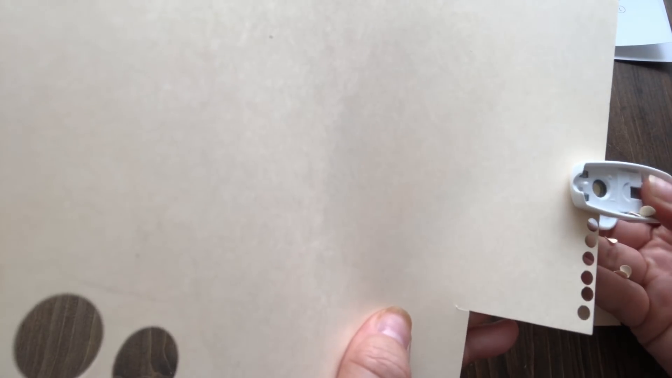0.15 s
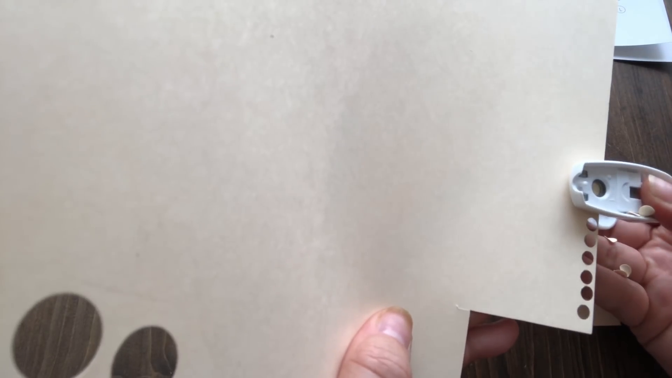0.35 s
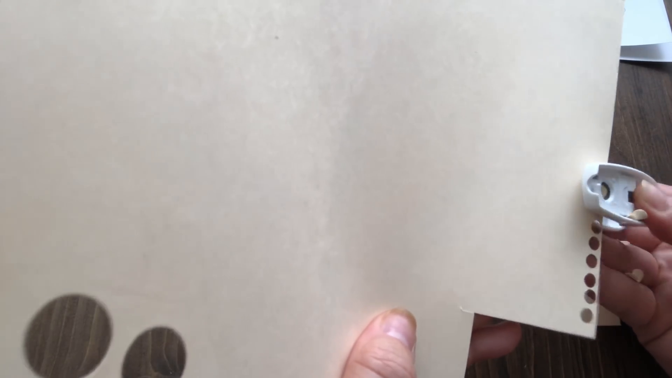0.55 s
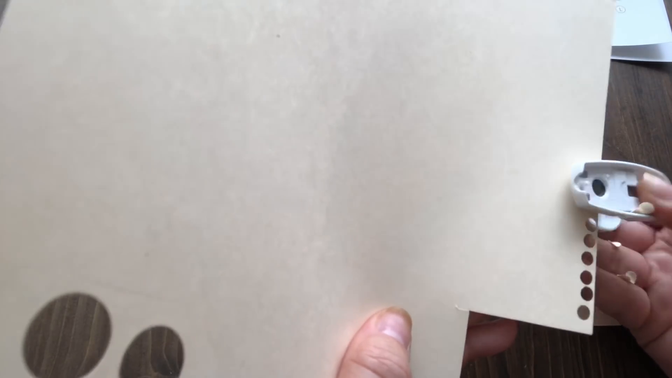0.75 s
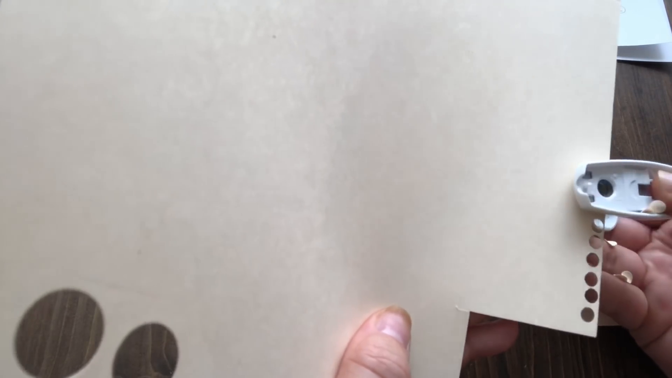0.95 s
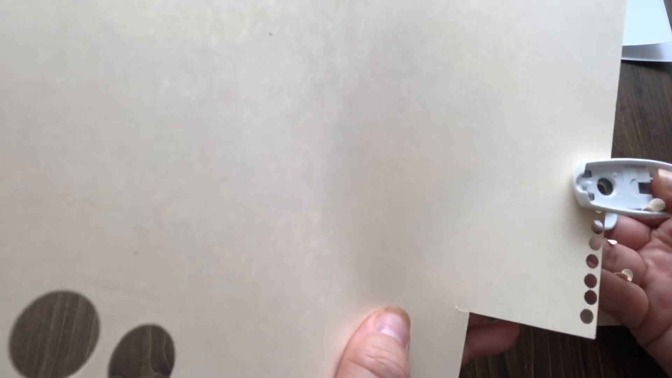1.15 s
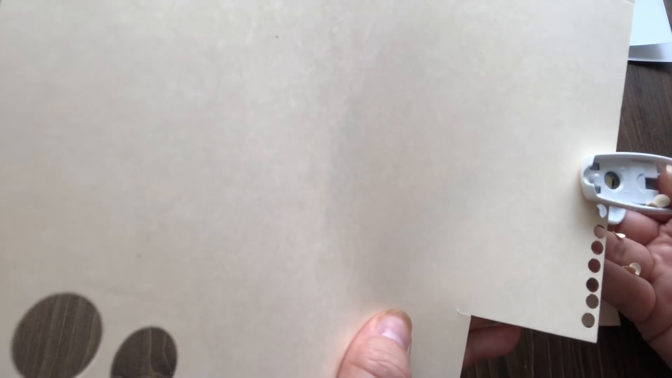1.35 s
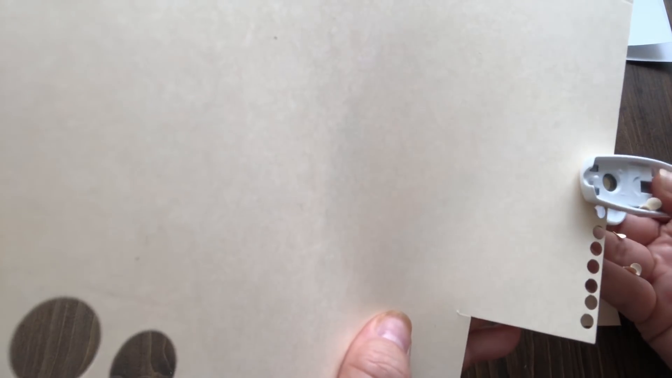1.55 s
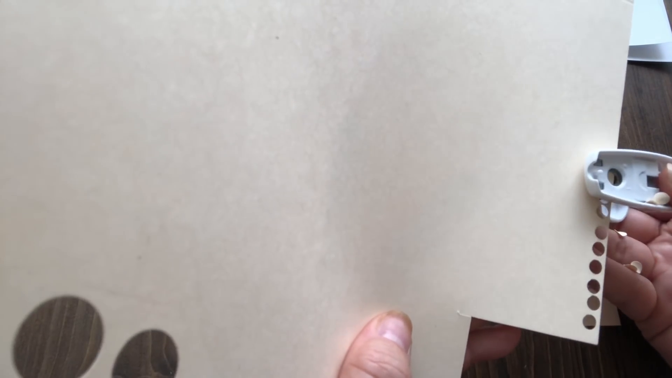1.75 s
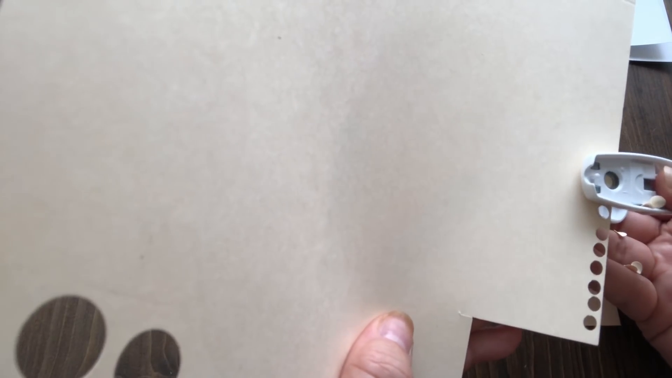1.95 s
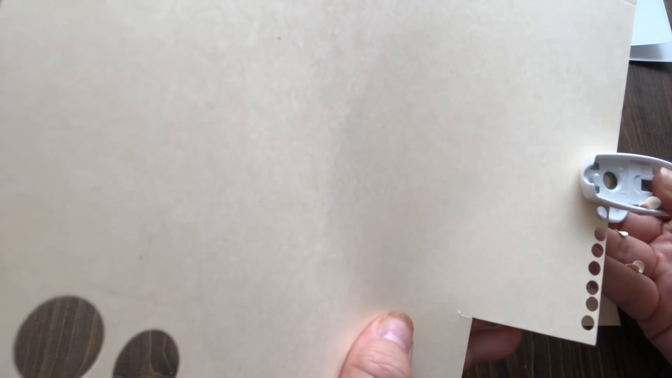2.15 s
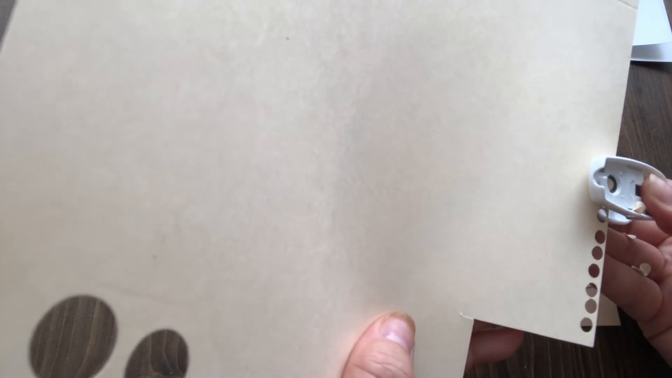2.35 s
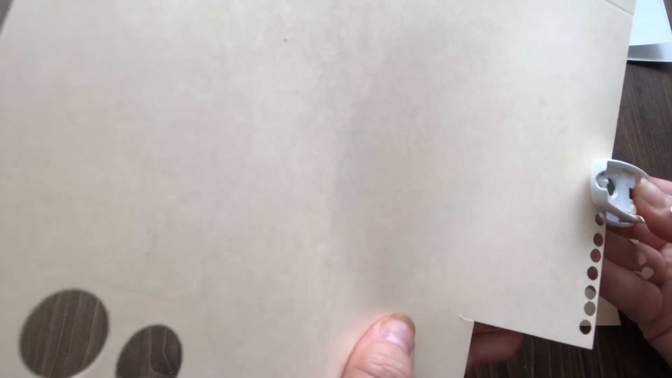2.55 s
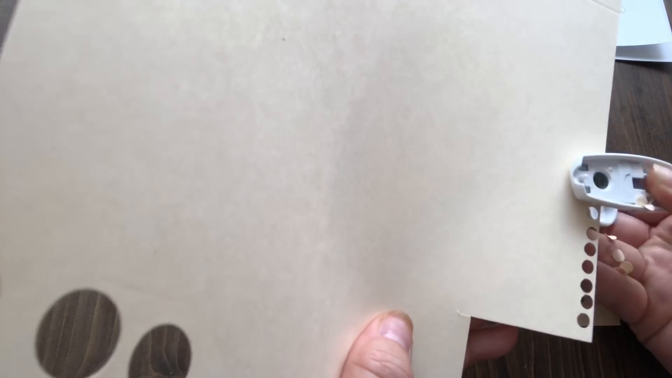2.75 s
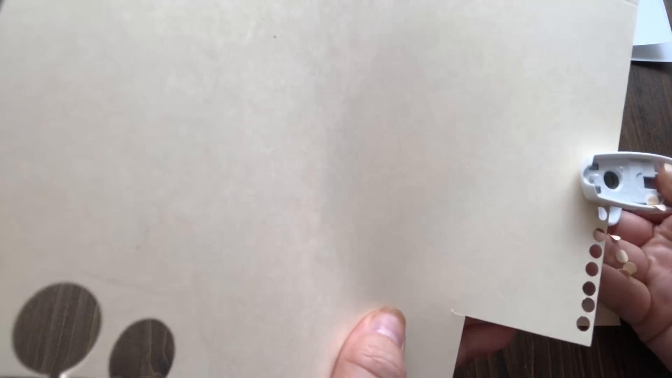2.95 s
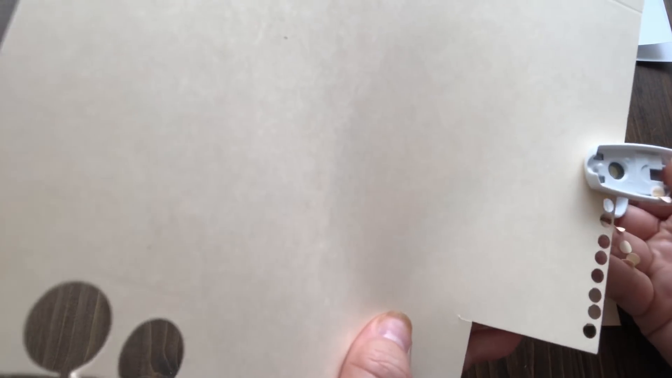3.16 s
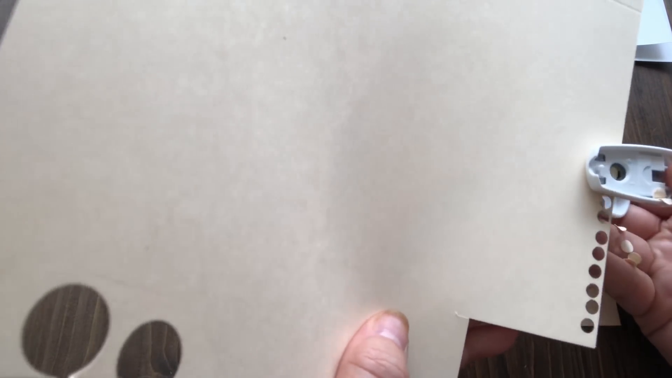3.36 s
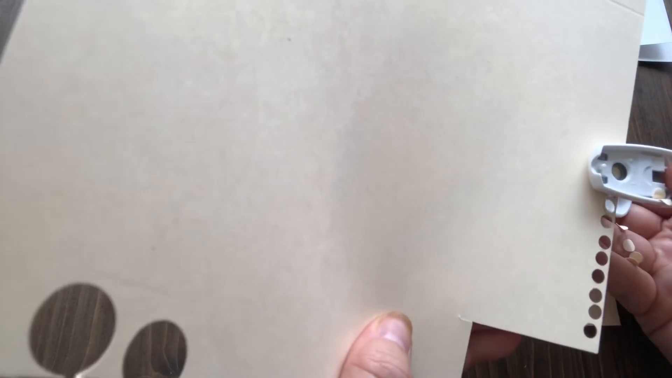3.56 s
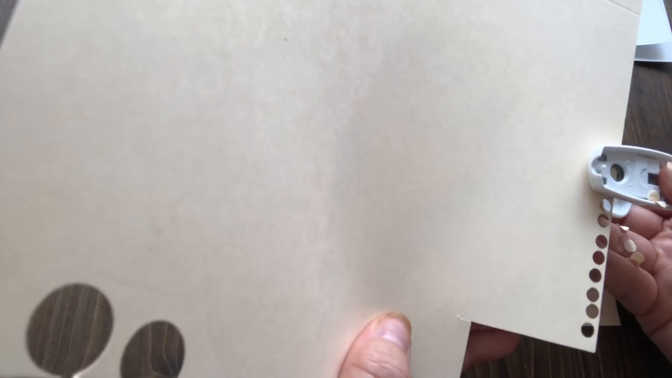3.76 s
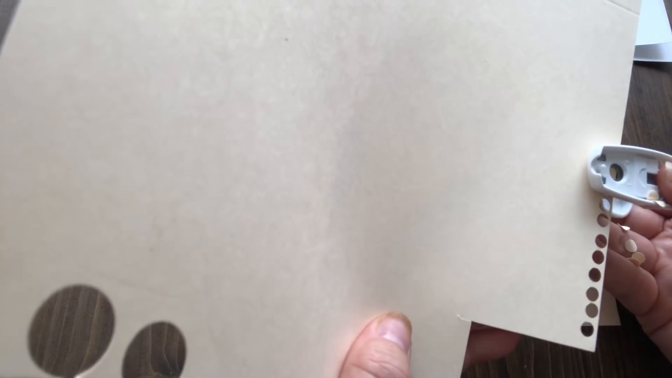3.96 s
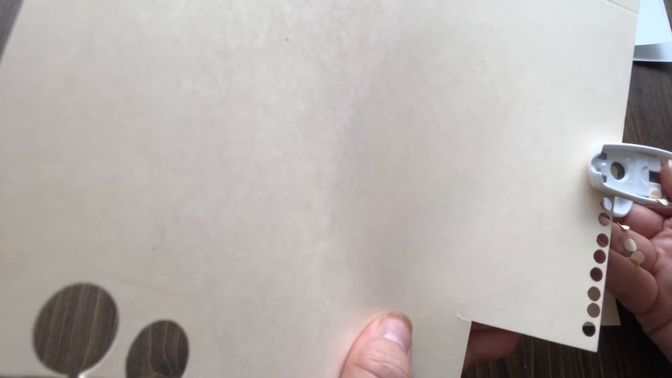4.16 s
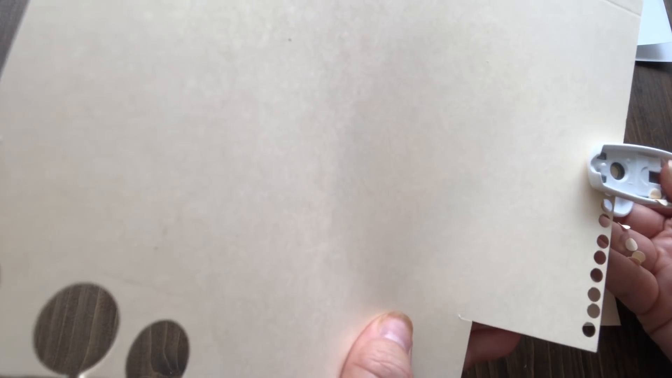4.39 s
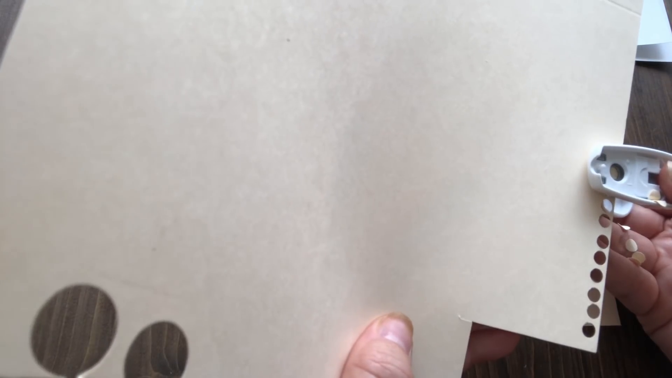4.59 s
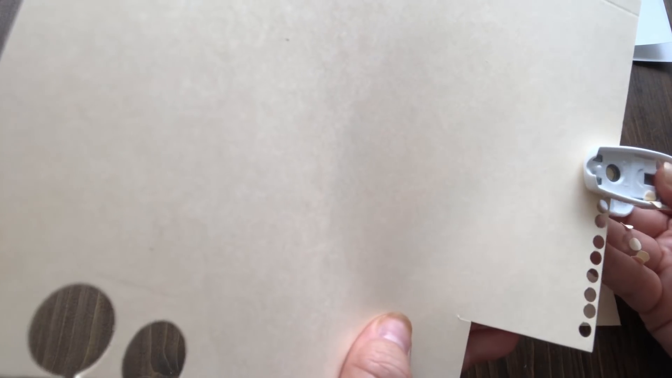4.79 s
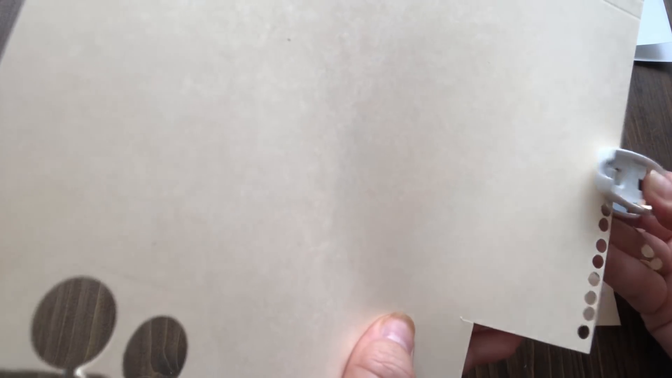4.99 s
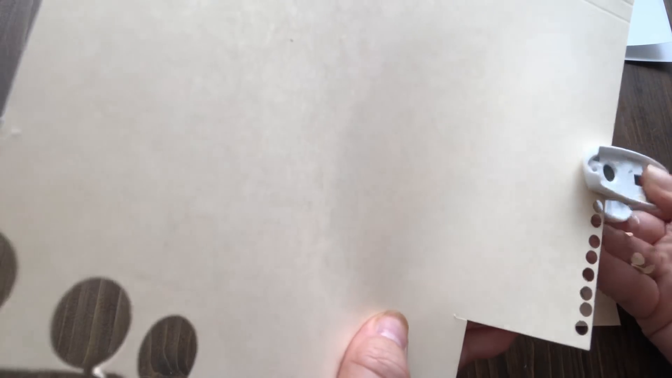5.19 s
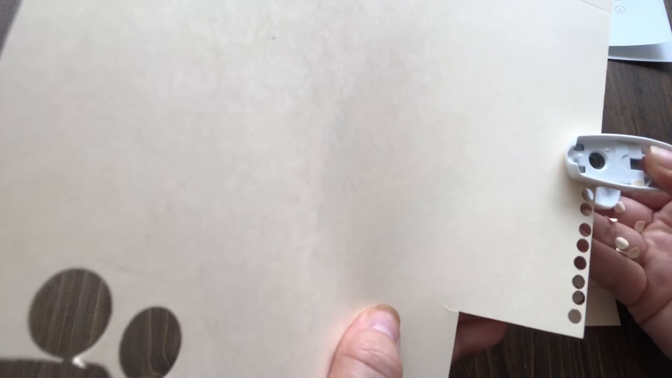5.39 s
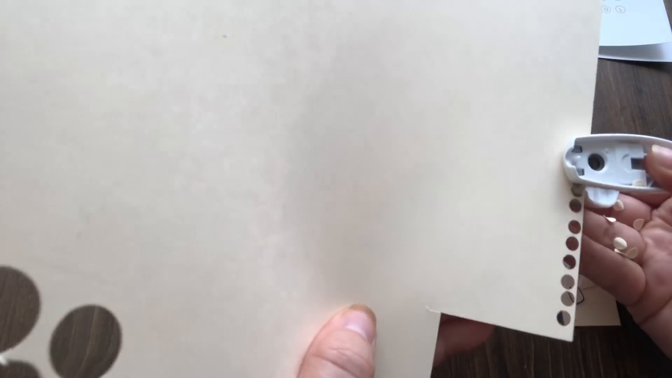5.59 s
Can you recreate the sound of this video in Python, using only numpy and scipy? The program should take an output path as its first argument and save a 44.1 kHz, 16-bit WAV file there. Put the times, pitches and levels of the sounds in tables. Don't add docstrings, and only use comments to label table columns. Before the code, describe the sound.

A small handheld punch crunches and snaps through a card folder three times, with light sliding and ticking between, over faint ventilation hum.

```python
import sys
import numpy as np
from scipy import signal
from scipy.fft import rfft, irfft
from scipy.io import wavfile
from scipy.ndimage import uniform_filter1d

SR = 44100
rng = np.random.default_rng(int(sys.argv[2]) if len(sys.argv) > 2 else 0)


def int16_out(signal):
    q = np.round(np.clip(np.atleast_2d(signal).T, -1, 1) * 32767)
    wavfile.write(sys.argv[1], SR, q.astype(np.int16))


def gain_from_db(level_db):
    decades = np.asarray(level_db, float) / 20
    return 10 ** decades


N = 248283


def unit(x):
    return x / np.sqrt(np.mean(x ** 2) + 1e-30)


def ring(x, hz, width):
    return signal.lfilter(*signal.iirpeak(hz, hz / width, fs=SR), x)


def body(x, modes):
    return sum((-1) ** k * gain_from_db(db) * ring(x, hz, width) for k, (hz, width, db) in enumerate(modes))


def add(out, s, x):
    i = int(s * SR)
    out[i:i + len(x)] += x[:N - i]


def grit(size, spread_db):
    return rng.standard_normal(size) * gain_from_db(spread_db * rng.exponential(size=size))


# frequency [Hz], level [dB per Hz].
HUM = [(20, -45), (31, -33), (50, -32.5), (62, -16), (99, -15.5), (130, 0.5), (220, -1), (310, -2.5),
       (400, -12), (1000, -17), (2000, -27.5), (4000, -30), (8000, -40), (15600, -49)]
# frequency [Hz], width [Hz], level [dB].
DUCT = [(80.4, 13, -65.5), (180, 4.6, -62.5), (253, 23, -56), (467, 28, -65.5), (7224, 60, -83.5),
        (9800, 30, -92.5)]


def hum():
    bin_hz = np.maximum(np.arange(N // 2 + 1) * SR / N, 1)
    hz, db = np.transpose(HUM)
    colour = gain_from_db(np.interp(np.log(bin_hz), np.log(hz), db))
    air = gain_from_db(-53.5) * unit(irfft(rfft(rng.standard_normal(N)) * colour, N))
    swell = unit(uniform_filter1d(rng.standard_normal(N), size=8000))
    ducts = sum(gain_from_db(db) * unit(ring(rng.standard_normal(N), f, width)) for f, width, db in DUCT)
    return (air + ducts) * gain_from_db(.7 * swell)


# centre [Hz], decay time t60 [s], level [dB].
ROOM = [(493, 0.21, -18.5), (789, 0.3, -21), (1290, 0.33, -20), (2093, 0.31, -21.5), (3170, 0.43, -20.5),
        (4780, .25, -20.5), (6300, 0.36, -18.5), (7850, 0.17, -19.5), (10500, 0.38, -20),
        (14000, 0.18, -18.5)]


def room(x):
    t, out = np.arange(SR // 2) / SR, 0
    start = np.clip((t - .002) / 0.0019, 0, 1)
    start = start * (1 + 6.4 * np.exp(-t / 0.0066))
    rattle = grit(size=N, spread_db=2.0)
    for k, (hz, t60, db) in enumerate(ROOM):
        band = signal.butter(2, [hz / 1.25, hz * 1.25], "band", fs=SR, output="sos")
        decay = start * 1e6 ** (-t / t60) * 50 / SR
        energy = signal.fftconvolve(signal.sosfilt(band, x) ** 2, decay)[:N]
        out = out + (-1) ** k * gain_from_db(db) * np.sqrt(np.abs(energy)) * unit(signal.sosfilt(band, rattle))
    return out


# start [s], frequency [Hz], level [dB], decay time t60 [s].
TINK = (.103, 3700, -62, .5)


def tink():
    out, t = np.zeros(N), np.arange(SR // 2) / SR
    s, hz, db, t60 = TINK
    partials = np.sin(2 * np.pi * hz * t) + .4 * np.sin(2 * np.pi * (hz + 22) * t)
    add(out, s, gain_from_db(db - 60 * t / t60) * partials)
    return out


# start [s], length [s], frequency [Hz], width [Hz], level [dB].
WHINES = [
    (2.507, .011, 8200, 500, -66),
    (5.086, .016, 8200, 400, -63),
    (.06, .39, 440, 40, -62),
    (3.86, .13, 755, 15, -63),
]


def whines():
    out = np.zeros(N)
    for s, length, hz, width, db in WHINES:
        noise = rng.standard_normal(SR)[:int(length * SR)]
        narrow = ring(ring(noise, hz, width), hz, width)
        add(out, s, gain_from_db(db) * unit(narrow) * np.hanning(len(noise)) ** 0.17)
    return out


# frequency [Hz], width [Hz], level [dB].
SHEET = [(44.58, 29, -21), (66.5, 18, -5), (92, 30, -4.5), (173.7, 41, -1.5), (271.6, 23, -0.5),
         (388, 50, -2), (564, 120, 0)]
# start [s], level [dB], shaking time [ms], bass tilt [dB per octave].
JOLTS = [
    (0.615, -45, 20, -4),
    (0.675, -34, 51, -2.3),
    (0.828, -54.5, 33, -3),
    (2.38, -42.5, 40, -1.5),
    (2.518, -34.5, 64, -2),
    (2.711, -54, 36, 2),
    (3.142, -48, 46, 1),
    (4.947, -41.5, 31, 0.5),
    (5.102, -33, 37, -1),
    (5.276, -49.5, 85, -5),
]


def sheet():
    out, t = np.zeros(N), np.arange(SR // 2) / SR
    for s, db, ms, tilt_db in JOLTS:
        for hz, width, mode_db in SHEET:
            shaking = rng.standard_normal(len(t)) * np.exp(-t * 1000 / ms)
            swing = ring(shaking, hz, width)
            add(out, s, swing / np.abs(swing).max() * gain_from_db(db + mode_db + tilt_db * np.log2(hz / 170)))
    return out


def strokes(table, rates):
    t, level = np.arange(N) / SR, np.zeros((3, N))
    rise, sag, fades = rates
    for s, hold, db, card_db, edge_db in table:
        held = db + rise * np.minimum(t - s, 0) - sag * np.clip(t - s, 0, hold)
        for k, rel_db in enumerate((0, card_db, edge_db)):
            level[k] += gain_from_db(held + rel_db - fades[k] * np.maximum(t - s - hold, 0))
    return level


# frequency [Hz], width [Hz], level [dB].
LEVER = [(2150, 350, 2.5), (2856, 430, 2.5), (3560, 470, 1.5), (4590, 216, 1.5), (5680, 760, -9)]
CARD = [(704, 235, -2), (1013, 290, -0.5), (1436, 340, -2.5), (1660, 420, -8.5)]
EDGE = [(6600, 780, -8), (8600, 1300, -1.5), (9240, 930, -2), (11300, 980, -3), (14000, 5300, -10)]
# start [s], hold [s], lever ring [dB], card over lever [dB], edge over lever [dB].
DRAGS = [
    (.626, 0.019, -40, -4.5, -3.5),
    (.84, 0.054, -43.5, 4, -9),
    (2.392, 0.034, -43, 1, -4),
    (2.722, 0.052, -40, -3, -8),
    (4.964, 0.023, -43, -0.5, -4),
    (5.282, 0.082, -41.5, -0.5, -11),
]
# rise, sag while held, then the fades of lever, card and edge [all dB per s].
DRAG_DB_PER_S = (3000, 92, (300, 220.5, 899.5))
# start [s], hold [s], lever ring [dB], card over lever [dB], edge over lever [dB].
SLIDES = [(0, 0.073, -63.5, 2, -20), (.11, .018, -61.5, 2, -13), (.135, 0.19, -66, 2, -18),
          (.583, 0.028, -70, 7, -2), (1.048, 0.028, -60.5, 4, -21), (1.118, 0.022, -54.5, 6.5, -25),
          (1.215, 0.13, -58.5, -1, -14), (1.43, 0.14, -67.5, -5, -14), (1.787, 0.057, -58, 4.5, -19),
          (2.06, 0.062, -73.5, 7, -14), (2.338, 0.038, -74, 7, -1.5), (2.49, 0.033, -65.5, -3.5, -12),
          (3.024, 0.008, -60, 11.5, -22), (3.12, 0.011, -64, 10, -27.5), (3.17, 0.0091, -56.5, 6.5, -11),
          (3.25, .07, -59.5, -5, -16), (3.35, 0.053, -62, 0.5, -21.5), (3.89, 0.18, -69.5, 2, -18.5),
          (4.282, 0.055, -53.5, 7, -17.5), (4.42, 0.11, -61.5, 5, -16), (4.585, .065, -63, 3, -24),
          (5.065, 0.038, -58.5, -10, -7.5), (5.535, 0.029, -67, 10, -16), (5.605, 0.044, -53.5, 4, -14.5)]
# rise, sag while held, then the fades of lever, card and edge [all dB per s].
SLIDE_DB_PER_S = (806.5, 24, (649.5, 549.5, 800.5))


def rubbing():
    level = strokes(DRAGS, DRAG_DB_PER_S) + strokes(SLIDES, SLIDE_DB_PER_S)
    patch = uniform_filter1d(np.repeat(rng.standard_normal(N // 128 + 1), 128)[:N], size=128)
    force = grit(size=N, spread_db=1.64) * gain_from_db(3.9 * patch)
    return sum(g * unit(body(force, modes)) for g, modes in zip(level, (LEVER, CARD, EDGE)))


def contact(ms, rise, fall, lead, spread_db):
    u = np.arange(2048) / SR * 1000 / max(ms, .1)
    force = unit(grit(size=2048, spread_db=spread_db)) * np.minimum(u / rise, 1) * np.exp(-u ** fall)
    force[0] += lead
    return force


def struck(force, modes, late=0.):
    total = 0
    for k, (hz, width, db) in enumerate(modes):
        r = np.roll(ring(force, hz, width), int(late * SR / hz))
        total = total + (-1) ** k * gain_from_db(db) * r / np.abs(r).max()
    return total / np.abs(total).max()


def knocks(table, metal, edge, card_width, **shape):
    out = np.zeros(N)
    for s, db, card_db, edge_db, card_hz, ms in table:
        force = contact(ms, **shape)
        card = struck(force, [(card_hz, card_width, 4.0)] + CARD[::-1], late=.6)
        sound = struck(force, metal) + gain_from_db(card_db) * card + gain_from_db(edge_db) * struck(force, edge)
        add(out, s, gain_from_db(db) * sound)
    return out


# start [s], lever ring [dB], card over lever [dB], edge over lever [dB], card pitch [Hz].
BOUNCES = [(.6268, -30.5, 1, -10.5, 1038), (.6584, -34.5, -2.5, -10, 1290), (.6787, -19.5, 12.5, 4.5, 628),
           (.684, -17.5, -3.5, -16, 619), (.8628, -31.5, 0, -10, 1090), (2.4083, -31.5, -0.2, -13.5, 810),
           (2.4212, -31.5, -1, -6.5, 914), (2.5286, -30, 13.5, -8.5, 619), (2.5353, -29.5, -1, -14.5, 727),
           (5.1045, -21, 10, -6, 937), (5.1206, -31, 5, -5, 1335), (5.305, -30, -3.5, -6, 1310)]
# start [s], lever ring [dB], card over lever [dB], edge over lever [dB].
TICKS = [(.1221, -59, -2, 10), (1.0576, -40, -15, -25), (1.088, -50, 7, -26), (1.1105, -32.5, -1, -33),
         (1.1384, -38.5, -2, -18.5), (1.3148, -48, -8, -7), (1.332, -48, -1.5, -13), (1.5462, -63, -5, 3),
         (1.5831, -57, 1.5, 5), (3.0221, -36.5, -11, -30), (3.0403, -52.5, 14, -22),
         (3.0758, -60, 18.5, -18), (3.1205, -65, 5, -17), (3.137, -32, 6.5, -32), (3.1642, -25.5, -4, -35),
         (3.1682, -31.5, 4.5, -14), (3.263, -47, -8, -10), (3.3095, -44, -17, -18), (3.3893, -48, 3, -24),
         (4.2773, -46, 10, -15), (4.4238, -55.5, -3.5, 4), (5.5442, -46, 7, -12), (5.5664, -45, -1.5, -13),
         (5.5871, -49, 11, -37.5)]


def ticks():
    bounce_ms, tick_card_hz, tick_ms = 0.75, 716, 0.94
    small = [(*row, bounce_ms) for row in BOUNCES] + [(*row, tick_card_hz, tick_ms) for row in TICKS]
    return knocks(small, LEVER, EDGE, card_width=310.0, rise=0.059, fall=1.4, lead=2.1, spread_db=0.0)


# frequency [Hz], width [Hz], level [dB].
SPRING = [(1690, 590, -2), (2270, 400, -3.5), (3050, 220, 3), (3730, 330, 1), (4315, 210, 1.5),
          (5580, 900, 0.5), (6780, 310, -3), (7930, 230, -7)]
# start [s], spring ring [dB], card over spring [dB],
# edge over spring [dB], contact length [ms].
RELEASES = [
    (0.8277, -25, -20, -25, 0.54),
    (0.8326, -23, -13, -13, 2.1),
    (.8417, -57, 14, 24.5, 1.2),
    (2.71, -19, -18, -32, 0.58),
    (2.7125, -25, -13, -19, 0.49),
    (2.7136, -21.5, -3.5, -14, 0.7),
    (5.27, -37, -17, -23, .75),
    (5.2733, -45, -2, -17, 1.05),
    (5.2766, -14.5, -28, -31, 0.24),
    (5.2799, -15, -16, -20.5, 0.48),
]


def releases():
    card_hz = 1186
    opening = [(*row[:4], card_hz, row[4]) for row in RELEASES]
    return knocks(opening, SPRING, EDGE, card_width=120.0, rise=0.085, fall=1.2, lead=2.1, spread_db=3.5)


# frequency [Hz], width [Hz], level [dB].
GRIPS = [
    [(632, 62, 1.5), (1032, 83, 0.5), (1430, 200, -19), (1972, 360, 2.5), (2480, 161, -5), (2970, 250, 1),
     (3570, 280, -15), (4260, 440, 1), (6080, 440, -5)],
    [(780, 200, -11), (1170, 180, -8), (1400, 210, -8.5), (2020, 560, 0.5), (2150, 160, -7),
     (2984, 500, 0.5), (3515, 450, -17), (4550, 210, -6), (5900, 2000, -6)],
    [(810, 340, 1), (929, 120, 1.5), (1158, 230, -3), (1410, 230, -9.5), (1865, 170, -8), (2180, 200, -3),
     (2920, 330, 1), (3630, 120, -9.5), (4350, 370, -12.5)],
]
# start [s], ring [dB], edge crack [dB], contact length [ms].
SLAMS = [
    (.6764, -7.5, -16, 1.0),
    (2.5185, -5.5, -15, 1.7),
    (5.1011, -5, -20, 1.7),
]


def slams():
    out = np.zeros(N)
    for (s, db, edge_db, ms), grip in zip(SLAMS, GRIPS):
        force = contact(ms, rise=.15, fall=2.6, lead=5.0, spread_db=1.5)
        add(out, s, gain_from_db(db + 6) * struck(force, grip, late=.35) + gain_from_db(edge_db) * struck(force, EDGE))
    return out


# frequency [Hz], width [Hz], level [dB].
DIE = [(1920, 270, -5), (2490, 280, 0.5), (2940, 160, -0.5), (3530, 400, -2.5), (4530, 600, -2),
       (5470, 600, -5.5)]
FIBRES = [(7100, 800, -7.5), (7760, 690, -6), (10500, 980, 1), (13800, 4800, 5), (14100, 1800, -4)]
# start [s], die ring [dB], card ring over die [dB],
# fibre crack over die [dB], contact length [ms].
BITES = [
    (.6095, -42, 6, 5, 7.8),
    (.613, -21, 12, -3, 3.5),
    (0.6182, -26.5, 6, -4, 7),
    (0.8292, -32.5, -24, -21, 11),
    (2.3737, -34.5, 6, -1, 12),
    (2.3805, -17, 2, -5, 3.2),
    (2.384, -25.5, -0.5, -3, 6),
    (4.9472, -43, 6.5, 2.5, 4),
    (4.9523, -18.5, -2.5, -5, 8.6),
    (5.002, -35, -1, -4, 12.5),
]
# start [s], die ring [dB], card pitch [Hz].
SEATS = [
    (1.1104, -45.5, 854),
    (1.1110, -42, 1270),
]


def bites():
    bite_card_hz = 1310
    seat_card_db, seat_edge_db, seat_ms = 13, -28, 7
    tearing = [(*row[:4], bite_card_hz, row[4]) for row in BITES]
    seating = [(s, db, seat_card_db, seat_edge_db, hz, seat_ms) for s, db, hz in SEATS]
    torn = knocks(tearing, DIE, FIBRES, card_width=300., rise=0.16, fall=2.0, lead=.01, spread_db=0.5)
    seated = knocks(seating, DIE, FIBRES, card_width=73.0, rise=0.097, fall=2.0, lead=.01, spread_db=-3.5)
    return torn + seated


def scene():
    hits, rubs = bites() + slams() + releases() + ticks(), rubbing()
    tail = room(hits + 0.41 * rubs)
    return (hits + rubs + tail + sheet() + tink() + whines() + hum())[None]


def top_cut(x):
    return signal.sosfilt(signal.butter(12, 17070, fs=SR, output="sos"), x)


def record(dry):
    low = signal.butter(2, 45, "high", fs=SR, output="sos")
    top = signal.ellip(8, .2, 70, 15950, fs=SR, output="sos")
    soft = np.tanh(signal.sosfilt(low, dry) * .8) / .8
    return top_cut(signal.sosfilt(top, soft))


dry = scene()
out = record(dry)
int16_out(out)
```